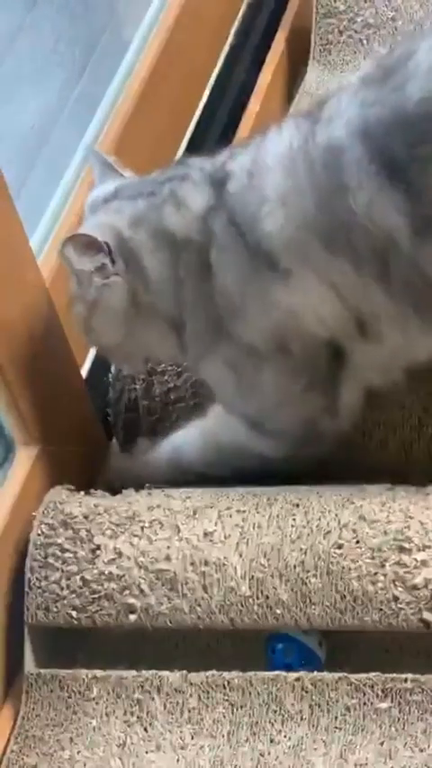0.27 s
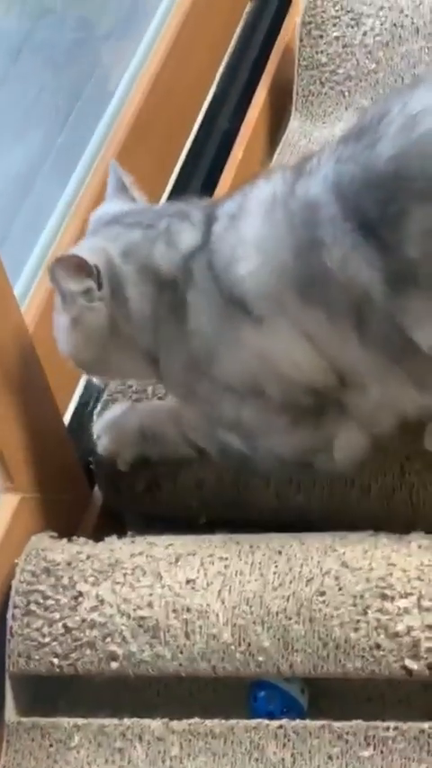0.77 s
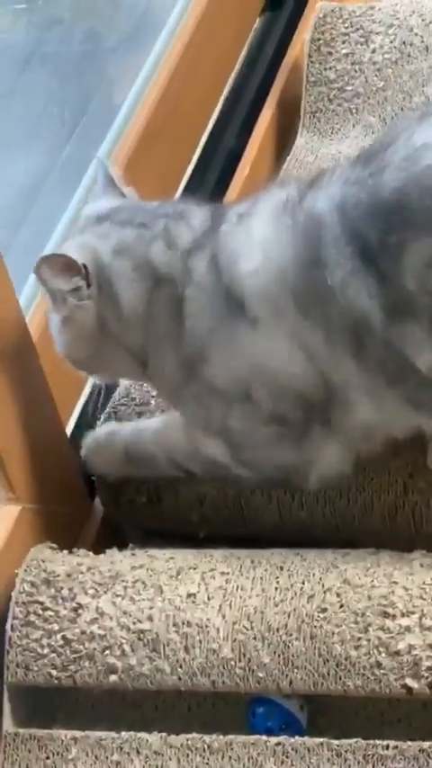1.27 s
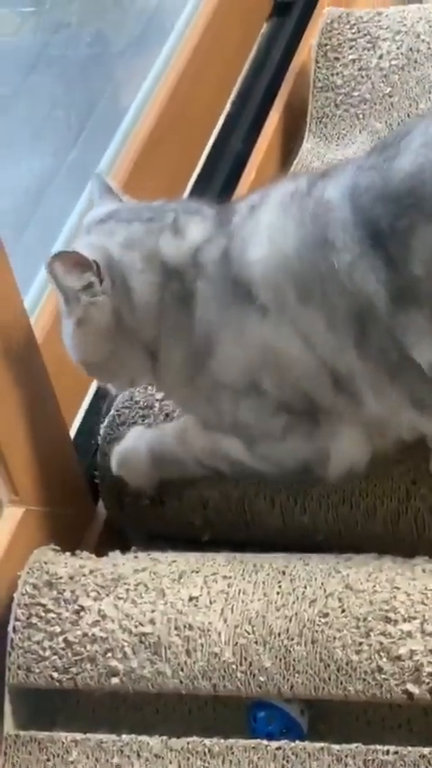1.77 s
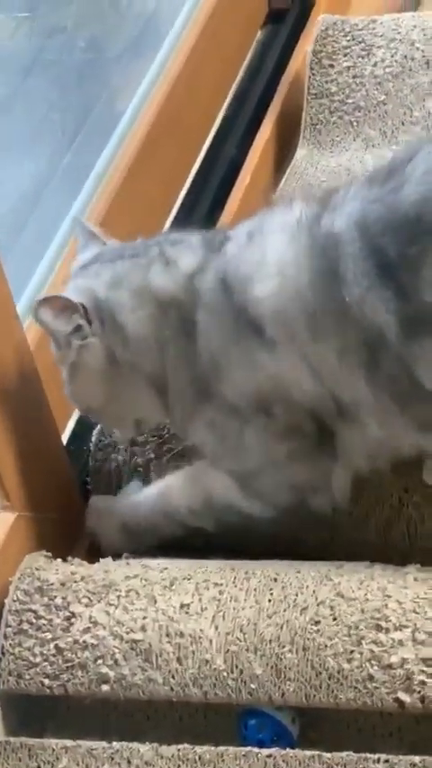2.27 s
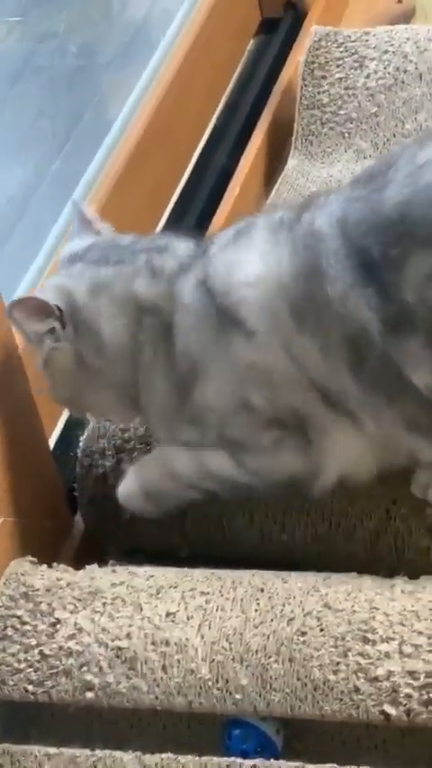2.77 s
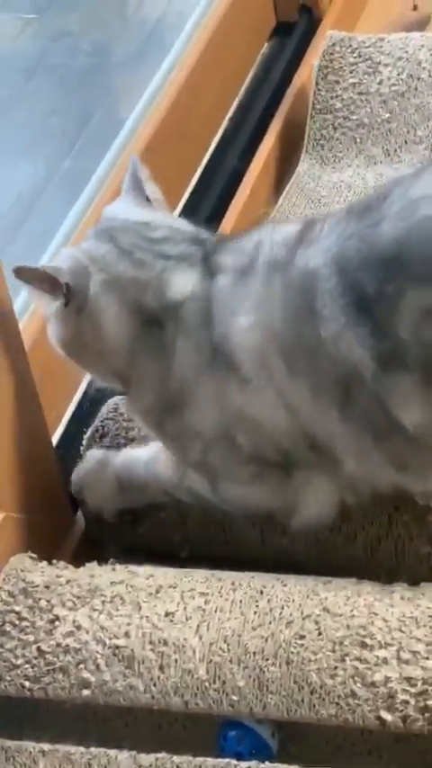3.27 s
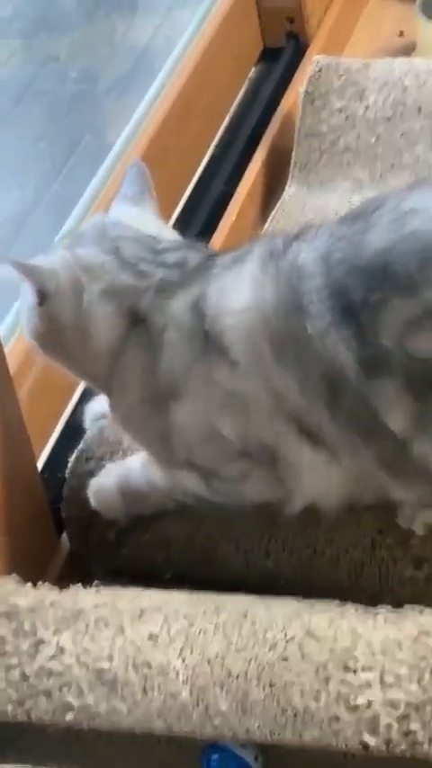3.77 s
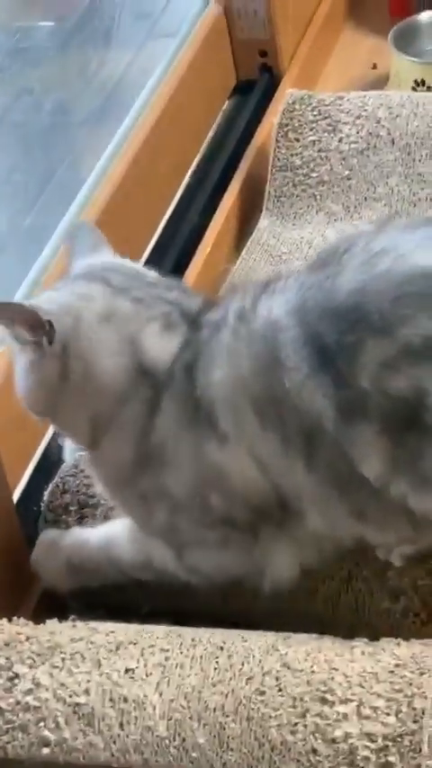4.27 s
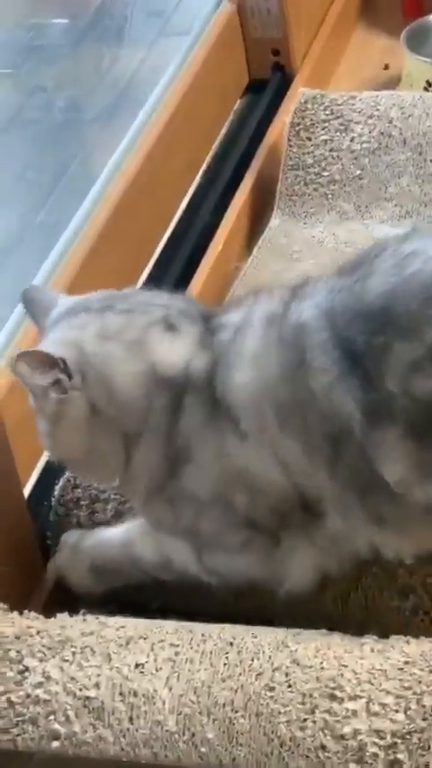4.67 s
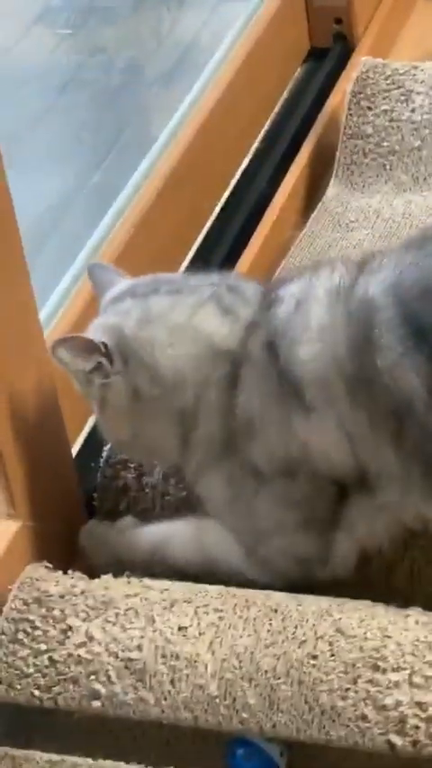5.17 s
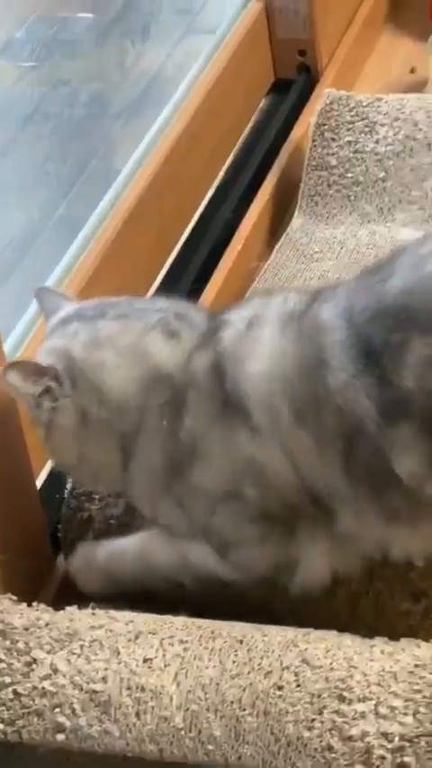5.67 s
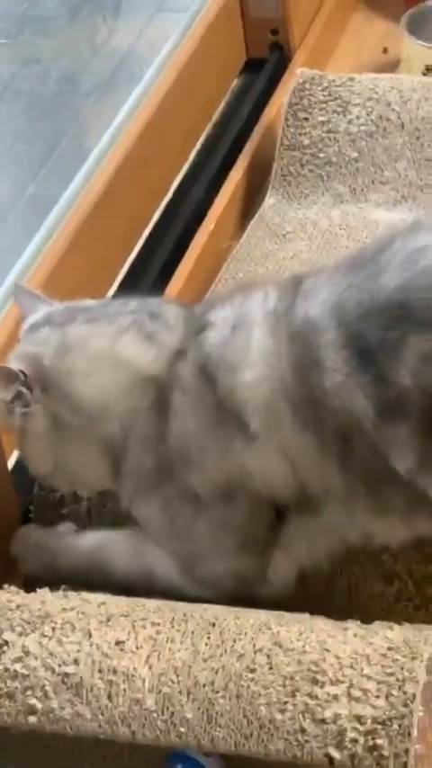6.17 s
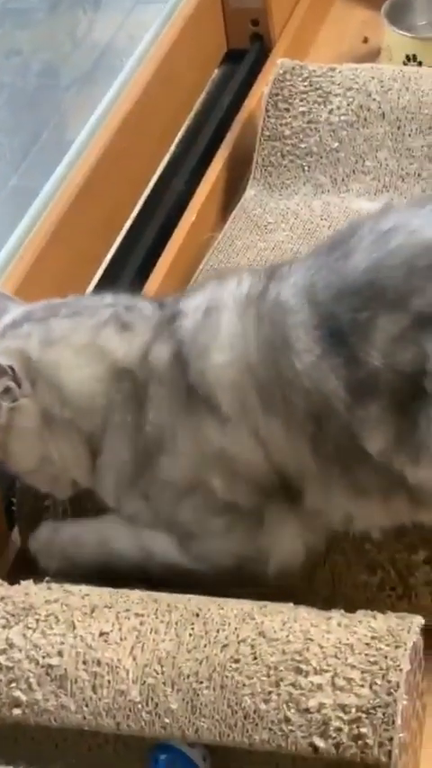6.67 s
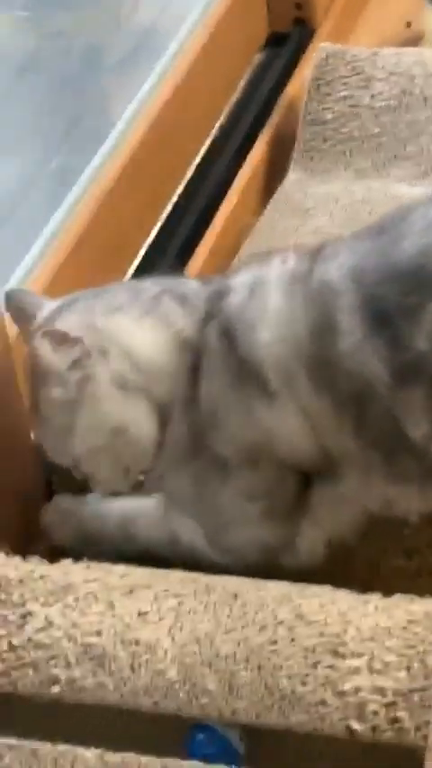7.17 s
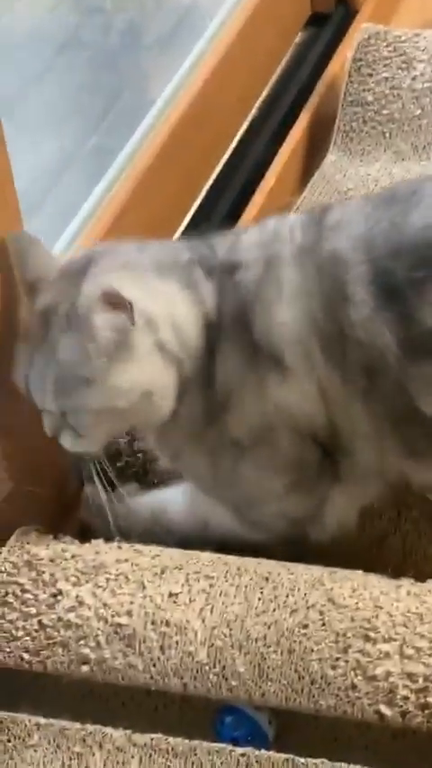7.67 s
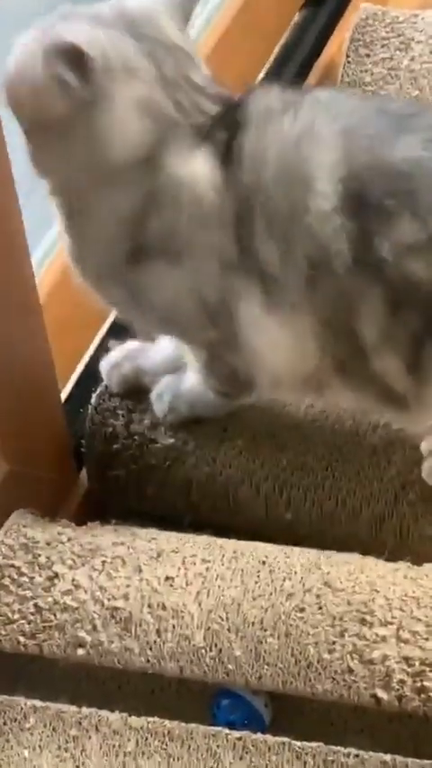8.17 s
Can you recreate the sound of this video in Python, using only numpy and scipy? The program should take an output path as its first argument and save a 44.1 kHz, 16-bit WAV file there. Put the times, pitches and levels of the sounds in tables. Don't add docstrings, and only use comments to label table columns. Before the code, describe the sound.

A cat's claws catch and tear free of carpet pile, making hollow boxy bumps, hissing fibres and dry ticks. Strokes come singly or in quick groups, strongest around five and a half to six and a half seconds, where low thuds rock the tower. After a last pop and some taps it goes nearly quiet, with a faint high whistle. Indoors, close small microphone, slight room echo.

```python
import sys
import numpy as np
from scipy import signal
from scipy.fft import rfft, irfft, next_fast_len
from scipy.io import wavfile
from scipy.ndimage import uniform_filter1d

SR = 44100
rng = np.random.default_rng(int(sys.argv[2]) if len(sys.argv) > 2 else 0)


def volts_from_db(level):
    exponent = np.asarray(level, float) / 20
    return 10 ** exponent


def to_wav(s):
    ch = np.atleast_2d(s).T
    pcm = np.round(np.clip(ch, -1, 1) * 32767)
    wavfile.write(sys.argv[1], SR, pcm.astype(np.int16))


N = 371763
GRID = next_fast_len(N + SR, real=True)
HZ = np.fft.rfftfreq(GRID, 1 / SR)

# start in seconds, tube air in dB,
# wall in dB re air, hiss in dB re air, wall pitch in Hz.
RIPS = [(0.002, -35.5, 4.5, -13, 1120), (0.858, -34, 0, -14, 800), (1.165, -41, -4, -1.5, 670),
        (1.65, -28, -5, -7.5, 630), (2.283, -33.5, -4.5, -1, 790), (3.025, -26, -2, -16, 1150),
        (3.388, -36.5, -5.5, 7.5, 720), (3.951, -40.5, -8, -21, 770), (4.3783, -28, -5, -38, 1000),
        (5.085, -29.5, -2, -15, 780), (5.208, -22, -8, -23.5, 1150), (5.442, -44, -3, 0, 1000),
        (5.517, -30, -18, -2, 550), (5.521, -28, -1, -5.5, 720), (5.952, -46, 0, -12, 890),
        (6.331, -38, -10, -12, 859), (6.364, -40, 3.5, -5, 1120), (6.431, -25, -2, -0.5, 870),
        (7.1163, -31.5, 1, -11, 1040)]


def unit(x):
    return x / np.sqrt(np.mean(x ** 2) + 1e-20)


def along(points, hz):
    f, v = np.transpose(points)
    return np.interp(np.log(hz + 1), np.log(f + 1), v)


def curves(rows):
    s, *cols = np.transpose(rows)
    return [np.interp(np.arange(N) / SR, s, c) for c in cols]


def wobble(rate):
    at = np.arange(N) * rate / SR
    knots = rng.standard_normal(int(N * rate / SR) + 4)
    k = at.astype(int)
    ease = np.sin(np.pi / 2 * (at - k)) ** 2
    return knots[k] + (knots[k + 1] - knots[k]) * ease


def jerks(spread_db, rate):
    return unit(rng.standard_normal(N) * volts_from_db(spread_db * wobble(rate)))


def filtered(x, response):
    return irfft(rfft(x, GRID) * response(HZ), GRID)[:N]


def resonance(f, hz, width):
    return 1j * f * width / (hz * hz - f * f + 1j * f * width)


def modes(table):
    def response(f):
        shape = sum((-1) ** k * volts_from_db(db) * resonance(f, hz, width) for k, (hz, width, db) in enumerate(table))
        return shape / np.sqrt(np.mean(np.abs(shape) ** 2))
    return response


def colour(table):
    return lambda f: unit(volts_from_db(along(table, f)))


def hush():
    # frequency in Hz, density in dB per Hz.
    house = [(15, -27), (66, -5), (118, -13), (190, -44), (310, -9), (3000, -22.5), (13500, -34.5),
             (15000, -46.5)]
    bed = filtered(rng.standard_normal(N), colour(house))
    restless = jerks(1.5, rate=6)
    rumble = filtered(restless, modes([(38, 27, 0.0), (64, 31, 1.5), (122, 65, -8.5)]))
    return volts_from_db(-69.5) * bed + volts_from_db(-60) * rumble


def room(x):
    # frequency in Hz, time to fall 60 dB in seconds.
    decay = [(100, 0.4), (350, 0.55), (1000, 0.5), (3000, 0.69), (10000, 0.44)]
    # frequency in Hz, level in dB re direct sound.
    answer = [(100, -1.5), (350, -6.5), (1000, -3.5), (3000, -11), (8000, -9.5)]
    wet, turn = 0, (np.arange(N) / SR / 0.37) % 3
    for k in range(3):
        hz, t, z = signal.stft(rng.standard_normal(SR * 3 // 4), SR, nperseg=256)
        fade = volts_from_db(-60 * t / along(decay, hz)[:, None])
        tail = signal.istft(z * fade, SR, nperseg=256)[1]
        share = np.clip(1 - np.abs((turn - k + 3 / 2) % 3 - 3 / 2), 0, 1)
        late = np.pad(tail, (200, 0)) / np.linalg.norm(tail)
        wet = wet + rfft(x * np.sqrt(share), GRID) * rfft(late, GRID)
    return irfft(wet * volts_from_db(along(answer, HZ)), GRID)[:N]


def whistle():
    # time in seconds, pitch in Hz, level in dB.
    glide = [
        (7.75, 12600, -92),
        (7.766, 11980, -75),
        (7.784, 11620, -73),
        (7.814, 10560, -87),
        (7.842, 11290, -74),
        (7.876, 11800, -73),
        (7.91, 11100, -78),
        (7.95, 10000, -84),
        (7.97, 9900, -93),
    ]
    hz, db = curves(glide)
    t = np.arange(N) / SR
    on = np.clip(np.minimum(t - glide[0][0], glide[-1][0] - t) / 0.013, 0, 1)
    phase = 2 * np.pi * np.cumsum(hz + 40 * wobble(120)) / SR
    return np.sqrt(2) * on * volts_from_db(db + 1.7 * wobble(60)) * np.sin(phase)


def rocking():
    t, swell = np.arange(N) / SR, 0
    for s, db in ((3.1, -46), (6.2, -47)):
        u = np.clip(t - s, 0, None) / 0.052
        swell = swell + volts_from_db(db) * u * np.exp(1 - u)
    return swell * unit(filtered(rng.standard_normal(N), modes([(51, 40, 0.1)])))


def swish():
    # middle in seconds, half length in seconds, level in dB, centre in Hz.
    sweeps = [(0.25, 0.067, -56.5, 12500), (0.42, 0.056, -69, 13400), (1.56, 0.036, -68, 14000),
              (1.945, 0.016, -43, 820), (1.982, 0.014, -44.5, 950), (2.04, 0.025, -56, 850),
              (0.884, 0.03, -48, 1400), (1.167, 0.004, -42, 2100), (5.15, 0.035, -46, 840),
              (3.026, 0.006, -44, 4500), (7.12, 0.006, -50, 5500), (3.87, 0.02, -66, 7000),
              (3.86, 0.02, -72, 12000), (4.52, 0.018, -62, 11000), (4.585, 0.018, -60, 8000),
              (3.075, 0.03, -45, 1500), (7.155, 0.022, -52, 1450), (3.45, 0.045, -62, 11000),
              (6.24, 0.015, -58, 11500), (7.16, 0.03, -57, 5000), (5.55, 0.035, -48, 2900),
              (2.29, 0.015, -40, 800), (7.307, 0.011, -51, 6200), (7.6, 0.13, -72, 3800),
              (7.6, 0.14, -69, 1550), (7.72, 0.04, -71, 7500), (7.6, 0.03, -73, 12000),
              (0.268, 0.022, -57, 2300), (0.18, 0.012, -56, 2600), (3.07, 0.04, -57.5, 2100),
              (7.16, 0.04, -58, 3300), (0.628, 0.03, -52, 1670), (4.235, 0.015, -59.5, 2050),
              (7.2, 0.047, -49, 1050), (7.335, 0.02, -45, 260), (6.23, 0.038, -37, 300),
              (2.461, 0.01, -46, 6500), (5.377, .012, -58, 12000), (5.521, 0.0072, -45, 12000),
              (7.62, 0.15, -71.5, 2640)]
    out = np.zeros(N + 2 * SR)
    grain = np.pad(jerks(1.3, rate=300) * volts_from_db(1.25 * wobble(9.3)), SR)
    t, f = np.arange(-SR // 2, SR // 2) / SR, np.fft.rfftfreq(SR, 1 / SR)
    for s, half, db, hz in sweeps:
        start = round(s * SR) + SR // 2
        at = slice(start, start + SR)
        band = unit(np.abs(resonance(f, hz, 0.44 * hz)) ** 2)
        swell = volts_from_db(db) * np.exp(-(t / half) ** 2)
        out[at] += irfft(rfft(swell * grain[at]) * band, SR)
    return out[SR:SR + N]


def knocks(table):
    rise, fade = 0.63, 2.14
    out = np.zeros(N + SR)
    for s, db, hz in table:
        u = hz / SR * np.arange(round(10 * SR / hz))
        swell = (1 - np.exp(-u / rise)) * np.exp(-u / fade)
        out[round(s * SR):][:len(u)] -= volts_from_db(db + 4) * swell * np.sin(2 * np.pi * u)
    return out[:N]


def roll_knocks():
    # start in seconds, peak in dB, pitch in Hz.
    hits = [(0.19, -25, 340), (0.199, -25, 330), (0.209, -26, 330), (0.628, -31, 342),
            (1.011, -25, 331), (1.025, -27, 310), (1.031, -29, 700), (1.411, -28, 339),
            (2.18, -23.5, 430), (2.191, -29, 520), (2.198, -23, 338), (2.304, -32, 339),
            (2.331, -33, 855), (2.467, -30, 331), (2.484, -36, 330), (3.0238, -20, 1070),
            (3.152, -38, 85), (5.226, -28, 340), (5.09, -33, 340), (3.08, -39, 42), (0.075, -38, 110),
            (2.179, -30, 280), (3.03, -40, 110), (3.417, -33, 340), (3.433, -26.5, 350),
            (4.385, -33, 110), (4.41, -36, 115), (0.86, -44, 115), (5.09, -46, 120), (7.12, -44, 115),
            (5.447, -42, 330), (1.66, -28, 657), (1.59, -29, 600), (2.1795, -28, 800),
            (0.614, -38, 340), (1.55, -24, 384), (1.556, -28, 680), (1.724, -32, 360),
            (6.436, -27, 370), (6.61, -36, 380), (6.73, -33.5, 350), (1.218, -32, 340),
            (1.389, -36.5, 2100), (6.431, -27, 1930), (5.5155, -29, 1950), (3.952, -36.5, 370),
            (5.519, -15.5, 377), (6.166, -22, 330), (6.175, -16, 330), (7.322, -27, 300),
            (7.355, -37, 290)]
    return knocks(hits)


def pops(answers):
    # start in seconds, level in dB, upper wall pitch in dB re lower.
    loops = [
        (0.8572, -26, 0),
        (3.023, -15, 1),
        (4.3769, -18, 0),
        (5.0849, -20, -4),
        (5.2068, -28, 3),
        (7.1153, -18, 0),
    ]
    train = []
    for s, db, upper in loops:
        for later, less, hz in answers:
            start = s + later - 1 / hz
            train.append((start, db + less + upper * (hz > 950), hz))
    return knocks(train)


def snaps():
    # start in seconds, peak in dB, pitch in Hz.
    loops = [(6.333, -39, 6200), (0.1825, -35, 6020), (1.5434, -29, 7120), (1.8991, -46, 6850),
             (1.9227, -30, 7650), (2.0722, -41, 6040), (2.3575, -29, 5980), (2.4573, -24, 6280),
             (2.5287, -31, 6370), (2.585, -48, 6910), (2.601, -35, 6160), (3.559, -32.5, 6900),
             (4.6164, -44, 6040), (4.7398, -31.5, 6740), (5.5158, -18, 4500), (5.7024, -40, 6200),
             (5.7086, -33, 6500), (5.7915, -43, 5617), (5.9135, -36, 6550), (6.365, -37, 6900),
             (6.2292, -32.5, 7260), (6.583, -31, 6460), (6.5845, -29, 6480), (6.6059, -33, 8260),
             (6.6163, -29.5, 6600), (6.7156, -29, 6340), (6.7321, -17.5, 5480), (6.842, -33, 6520),
             (7.3986, -32, 6970), (7.4, -31, 10960)]
    # start in seconds, peak in dB, pitch in Hz.
    further_loops = [(1.8278, -42, 3240), (2.0214, -55, 4660), (3.95, -39, 1850), (1.8856, -36, 7240),
                     (3.3887, -49, 7000), (3.5, -39, 5570), (4.519, -30, 5740), (4.8968, -36, 5540),
                     (5.6136, -44, 7100), (5.7294, -41, 6670), (6.9112, -39, 6550), (6.9316, -40.5, 2870),
                     (6.961, -41.5, 3030), (7.299, -38, 2190), (7.3998, -33, 14000)]
    # start in seconds, peak in dB, pitch in Hz.
    fibres = [(0.2154, -40, 7780), (0.2394, -36, 7400), (0.2544, -40, 4700), (0.2804, -42, 6900),
              (1.5544, -37, 6700), (1.5694, -39, 6320), (2.2854, -35, 6540), (2.2944, -37, 5810),
              (2.3114, -45, 5830), (2.3634, -42, 7060), (2.4064, -49, 6420), (2.4652, -31, 6770),
              (2.4744, -34, 6550), (2.484, -37, 6440), (2.502, -34, 6420), (2.6114, -44, 7250),
              (4.4404, -41, 7280), (4.4544, -43, 6200), (4.6244, -39, 6820), (4.6379, -38, 5840),
              (4.7507, -38, 6250), (4.762, -37, 6280), (4.92, -44, 5630), (5.3732, -46, 6580),
              (0.601, -50, 6100)]
    # start in seconds, peak in dB.
    plucks = [(0.858, -32), (1.004, -32), (5.0847, -36), (5.5154, -24), (7.1155, -26), (1.163, -34),
              (1.2146, -34), (1.392, -37), (1.5294, -29), (1.6477, -25), (2.177, -38), (2.279, -21),
              (3.0225, -22), (4.3775, -29), (5.2073, -33), (5.4405, -33), (5.9484, -38), (6.1525, -58),
              (6.332, -32), (6.3644, -45), (6.4318, -15.5)]
    events = loops + further_loops
    events = events + [(s, db + 8, hz) for s, db, hz in fibres]
    events = events + [(s, db, 2236) for s, db in plucks]
    out, t = np.zeros(N + SR), np.arange(SR // 50) / SR
    for s, db, hz in sorted(events):
        ragged, spit = rng.standard_normal((2, len(t)))
        flutter = 0.35 + 0.7 * unit(uniform_filter1d(ragged, size=round(2.5 * SR / hz)))
        tick = np.sin(2 * np.pi * hz * t) * flutter + 0.25 * spit
        out[round(s * SR):][:len(t)] += volts_from_db(db - 60 * t / 0.02) * (1 - np.exp(-t / 0.0014)) * tick
    return filtered(out[:N], lambda f: 1j * f / (1800 + 1j * f) * 9000 / (9000 + 1j * f))


def contacts():
    # start in seconds, tube air in dB, wall in dB re air,
    # hiss in dB re air, liveliest wall pitch in Hz.
    tugs = [(0.188, -27, -16, -18, 525), (0.289, -38, -21, -31, 681), (0.627, -40, -10, -26, 795),
            (1.009, -29, -5, -12, 607), (1.216, -33, -27, -13, 522), (1.392, -27, -8, -47, 640),
            (1.413, -29, -13, -36, 600), (1.549, -27.5, -4, -13.5, 660), (1.717, -30.5, -17.5, -12.5, 649),
            (2.176, -30.5, 0, -20, 510), (2.357, -39, -18, -6, 743), (2.464, -37, 1, 4, 1030),
            (3.113, -32.5, -3.5, -19, 1150), (3.431, -29, -5, -18, 497), (3.481, -44, -14.5, 1, 778),
            (4.419, -31, 0, -21, 789), (5.61, -47.5, 1, 4, 684), (5.793, -47.5, -8, 6, 522),
            (6.153, -28, -2.5, -15, 1050), (6.164, -30, -32, -45, 1120), (6.173, -28.5, -24, -42, 522),
            (6.456, -27.5, -13.5, -9, 690), (6.725, -40.5, -9, 6, 1010), (7.319, -33, -30, -62, 646)]
    # start in seconds, tube air in dB, wall in dB re air, hiss in dB re air.
    rakes = [(0.205, -30.5, -13, -11), (0.247, -43, -6, 1), (0.503, -42.5, -12, -16), (0.606, -39, -9, -12),
             (0.721, -46, -13, -25), (0.826, -35.5, -8, -16), (1.449, -41, -14, -17),
             (1.527, -29, -7.5, -10), (1.567, -34, -2, -11), (1.669, -50, 8, -25), (2.302, -50, 6, -12),
             (2.486, -40, -2, 1), (3.059, -47.5, 10, -3), (3.149, -61, 13, -28), (3.405, -34, -16, -4.5),
             (3.554, -43.5, -12, -4), (4.444, -34, -10, -11), (4.621, -38, -21.5, 0.5),
             (4.639, -49, -2.5, -18), (4.745, -39.5, -8, -0.5), (5.549, -45.5, 5, -1),
             (5.704, -36.5, -10, -1.5), (5.917, -39.5, -17, -16), (6.199, -33.5, -11, -25),
             (6.231, -42, -25, -15), (6.608, -43, -22, -17), (6.711, -41.5, 3, 0.5),
             (7.148, -45.5, 12.5, -10), (7.297, -34.5, -5.5, -27), (7.354, -39.5, -11, -48)]
    # start in seconds, tube air in dB, hiss in dB re air.
    brushes = [(0.334, -67, -22), (1.775, -56.5, 8.5), (1.897, -44, 2), (2.585, -44, 3), (2.968, -53, -5),
               (3.589, -73, -34), (3.669, -53, 3.5), (4.17, -56, -29), (4.226, -59, -14), (4.868, -47, 3.5),
               (4.919, -50, 4), (5.357, -43, -6), (5.749, -50.5, 3), (5.849, -73, 23), (6.024, -52, -26),
               (6.584, -54, 5.5), (6.841, -60, -9), (6.949, -57, -7), (7.549, -75, -21), (7.699, -77, 18),
               (8.294, -71, -7), (8.369, -79, -16)]
    strokes = [(*row, 745) for row in rakes]
    strokes = strokes + [(s, air, -8.5, hiss, 780) for s, air, hiss in brushes]
    return RIPS, tugs, strokes


def bursts(stretch, level_db, tables=None):
    out, t = np.zeros(N + SR), np.arange(int(stretch * SR / 12)) / SR / stretch
    rip = (1 - np.exp(-t / 0.00081)) * np.exp(-t / 0.015)
    tug = volts_from_db(0.8) * (1 - np.exp(-t / 0.0014)) * np.exp(-(t / 0.017) ** 1.2)
    rake = volts_from_db(-1.5) * (1 - np.exp(-t / 0.0055)) * np.exp(-(t / 0.038) ** 3.3)
    for table, shape in zip(tables or contacts(), (rip, tug, rake)):
        for s, *columns in table:
            start = max(round((s - 0.0015) * SR), 0)
            out[start:][:len(t)] += volts_from_db(level_db(*columns)) * shape
    return out[:N]


def weight():
    # start in seconds, thud in dB.
    leans = [(0.002, -44), (0.19, -40), (1.005, -47), (1.216, -50), (1.392, -44), (2.18, -39), (2.283, -56),
             (2.46, -42), (3.024, -50), (3.115, -43), (4.378, -40), (6.174, -46), (7.294, -47), (8.3, -65),
             (8.369, -62)]
    landing = bursts(2.8, lambda air, wall, hiss, hz: -58.5 + 0.18 * (air + 35))
    leaning = bursts(3.15, lambda thud: thud, ([], leans, []))
    low = modes([(70, 54, -5.0), (117.5, 74, 0.2), (163, 112, -5)])
    return filtered((landing + leaning) * jerks(1.4, rate=40), low)


def backing(slide_db):
    scrape = bursts(1.77, lambda air, wall, hiss, hz: air + 0.45 * hiss - 19)
    fur = volts_from_db(slide_db - 3.0 + 1.5 * wobble(21))
    return filtered((scrape + fur) * jerks(3, rate=560), modes([(1863, 560, 6.5), (3420, 4700, -3)]))


def patches(x, depth_db):
    z = signal.stft(x, nperseg=256)[2]
    field = uniform_filter1d(rng.standard_normal(z.shape), size=8, axis=0)
    field = uniform_filter1d(field, size=8, axis=1)
    return signal.istft(z * volts_from_db(depth_db * unit(field)), nperseg=256)[1][:N]


def pile_hiss(slide_db):
    # frequency in Hz, density in dB per Hz.
    fibre_tone = [(1500, -3.5), (2600, -17), (4000, -10.5), (6200, -3.5), (7600, -6), (9800, -16.5),
                  (13000, -15.5), (15000, -21)]
    torn = bursts(1.144, lambda air, wall, hiss, hz: air + hiss - 8)
    slid = volts_from_db(slide_db - 1.3 + 1.05 * wobble(30))
    return filtered((torn + slid) * patches(jerks(2.3, rate=430), depth_db=3.0), colour(fibre_tone))


def tube_air(drag):
    # frequency in Hz, width in Hz, level in dB.
    column = [(129, 53, -7.5), (247, 28.3, -3.5), (349, 60, 1), (474, 90, -19.5)]
    push = bursts(0.9, lambda air, wall, hiss, hz: air)
    swing = volts_from_db(-4.5) * push * np.sin(2 * np.pi * np.cumsum(330 + 40 * wobble(60)) / SR)
    shake = (volts_from_db(-5.0) * push + volts_from_db(-11) * drag) * jerks(2.9, rate=150)
    return swing + filtered(shake, modes(column))


def tube_wall(drag):
    # frequency in Hz, width in Hz, level in dB.
    shell = [(525, 130, -2), (720, 175, 5), (857, 270, 2.5), (1150, 420, 0.5), (1400, 580, -8),
             (1740, 390, -20.5), (2330, 380, -22)]
    shake, out = jerks(1.2, rate=300), 0
    for s, *_ in RIPS:
        shake[max(round((s - 0.0012) * SR), 0)] += 11
    for k, (mode_hz, width, db) in enumerate(shell):
        struck = bursts(1.0, lambda air, wall, hiss, hz: air + wall + 16 - 6 * np.log2(mode_hz / hz) ** 2)
        drive = (struck + volts_from_db(9.0) * drag) * shake
        out = out + (-1) ** k * volts_from_db(db) * rfft(drive, GRID) * resonance(HZ, mode_hz, width)
    return irfft(out, GRID)[:N]


def softened(f):
    return 1 / (1 + 1j * f / 5500) ** 2


def claws():
    # time in seconds, pressure on the tube in dB, sliding in dB.
    paw_drag = [(0.0, -40.5, -59), (0.3, -56.5, -65.5), (0.84, -55, -59.5), (1.06, -46.5, -63.5),
                (1.59, -63, -59), (1.9, -64, -68.5), (2.3, -47, -58), (2.9, -64.5, -70.5),
                (3.17, -59, -61.5), (3.92, -80.5, -74.5), (4.5, -48.5, -58), (4.93, -62.5, -68.5),
                (5.14, -45.5, -60.5), (5.88, -52.5, -66), (6.41, -49, -57), (7.0, -69, -72.5),
                (7.35, -50.5, -60), (8.43, -89, -79)]
    press_db, slide_db = curves(paw_drag)
    linger = bursts(5.85, lambda air, wall, hiss, hz: air + wall - 23)
    drag = (volts_from_db(press_db) + linger) * volts_from_db(3.2 * wobble(25))
    body = tube_air(drag) + tube_wall(drag) + weight() + backing(slide_db)
    return filtered(body, softened) + pile_hiss(slide_db)


def scene():
    # delay in seconds, level in dB, pitch in Hz.
    ring = [(.001, -20, 4700), (.0014, -15, 2350), (.0018, 1.5, 1200), (.0032, 0, 740), (.0054, -3, 1150),
            (.0065, -4, 760), (.0081, 0.5, 1170), (.011, -5, 760), (.0134, -2, 760), (.0147, -7, 1230),
            (.0177, -1, 700), (.0215, -5, 740), (.027, -10, 720)]
    # delay in seconds, level in dB, pitch in Hz.
    echoes = [(.0232, -8, 1170), (.0266, -10, 1270), (.0318, -11, 1160), (.0331, -4, 750),
              (.0357, -11, 1130), (.0386, -12, 1170), (.0418, -6, 770), (.0486, -13, 1170),
              (.0519, -8, 760), (.0554, -16, 1210), (.0602, -7, 750), (.0607, -11, 1155), (.0702, -12, 740),
              (.0726, -16, 1240), (.0784, -12, 730), (.0836, -9, 750), (.0982, -15, 800),
              (.0998, -17, 1240)]
    near = claws() + roll_knocks() + snaps() + whistle() + swish()
    pop = pops(ring)
    sent = near + volts_from_db(-9) * np.roll(pop, round(0.068 * SR))
    return (near + pop + pops(echoes) + room(sent) + hush() + rocking())[None]


def starved(x, margin_db, luck_db, jump_db, click_db):
    hz, _, z = signal.stft(x, SR, nperseg=1024)
    band = (np.arange(len(hz)) // 6)[:, None]
    power = np.add.reduceat(np.abs(z) ** 2, np.arange(0, len(hz), 6))
    level_db = 10 * np.log10(power + 1e-20)
    mask_db = level_db[16:30].mean(axis=0) - margin_db
    luck = unit(uniform_filter1d(rng.standard_normal(level_db.shape), size=7, axis=1))
    heard = uniform_filter1d(level_db, size=3, axis=1) + luck_db * luck > mask_db
    alive = heard[band, np.arange(z.shape[1])] | (hz < 3500)[:, None]
    sudden = np.diff(level_db[40:60].mean(axis=0), prepend=0) > jump_db
    keep = np.where((hz < 14250)[:, None], alive, volts_from_db(click_db) * sudden)
    return signal.istft(z * keep, SR, nperseg=1024)[1][:N]


def low_pass(x):
    return signal.sosfilt(signal.butter(12, 15380, fs=SR, output="sos"), x)


def record(dry):
    thinned = starved(dry[0], margin_db=12.5, luck_db=5, jump_db=13, click_db=-11)
    return low_pass(thinned[None])


dry = scene()
out = record(dry)
to_wav(out)
```